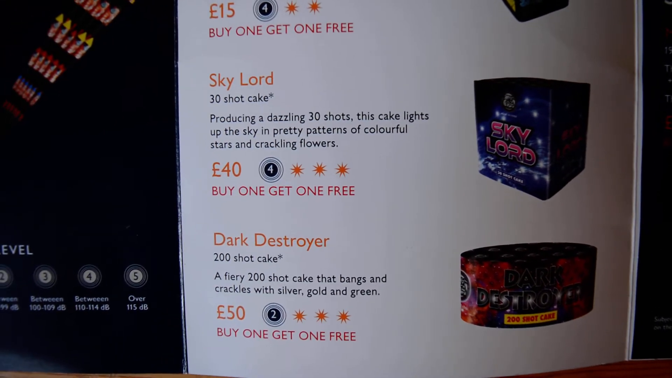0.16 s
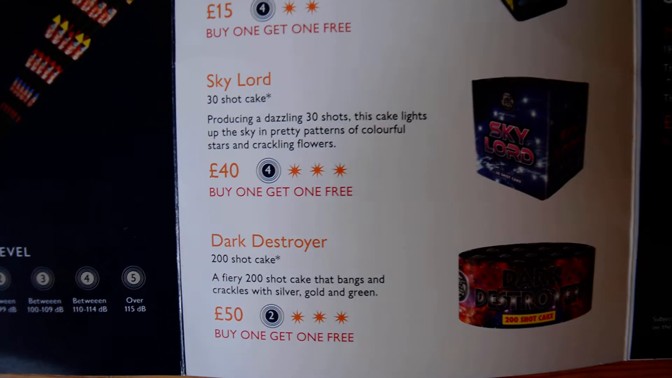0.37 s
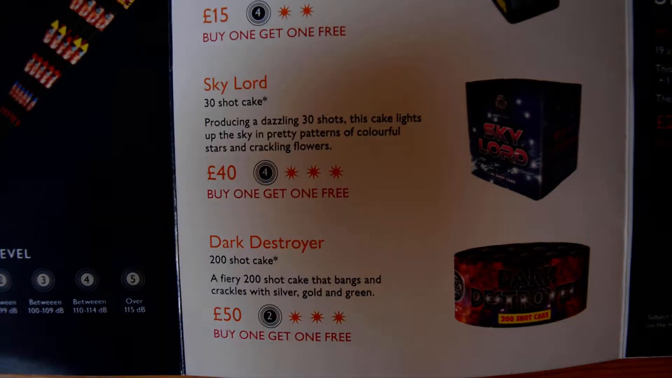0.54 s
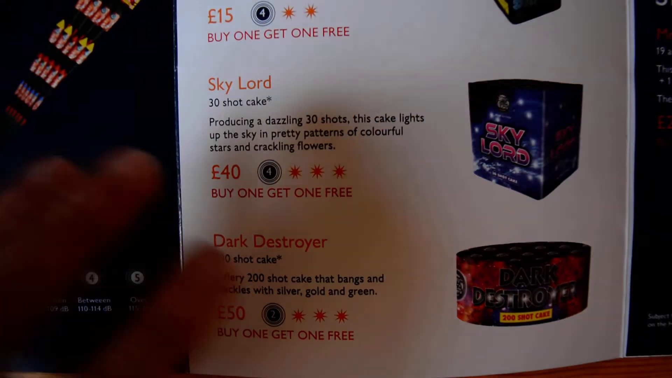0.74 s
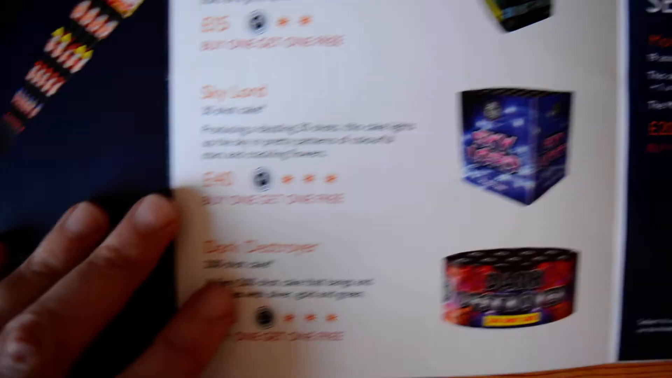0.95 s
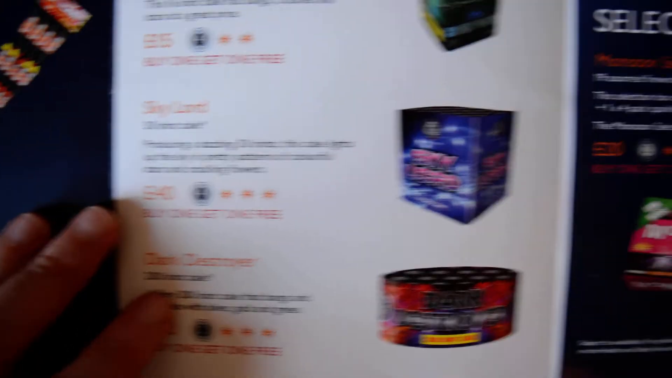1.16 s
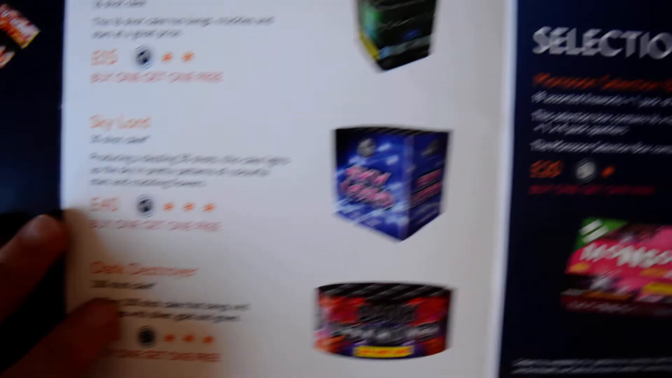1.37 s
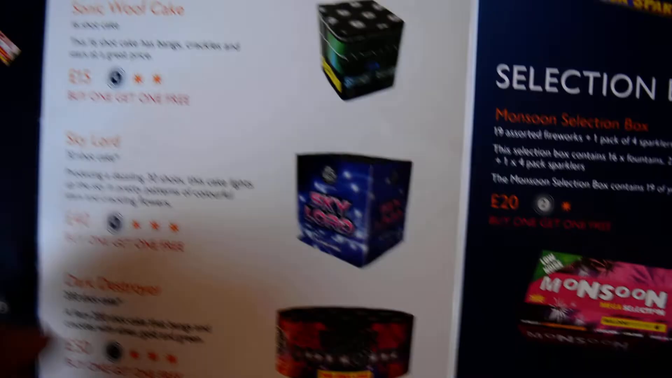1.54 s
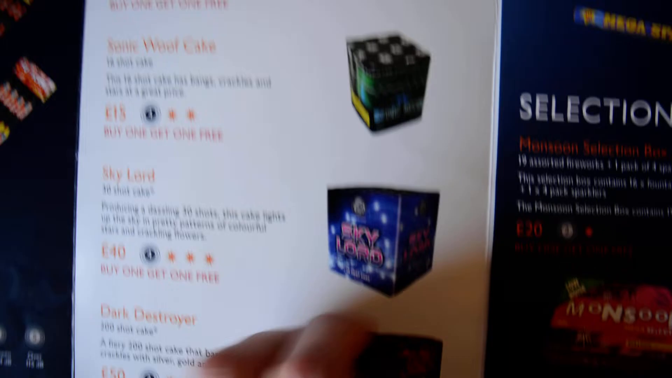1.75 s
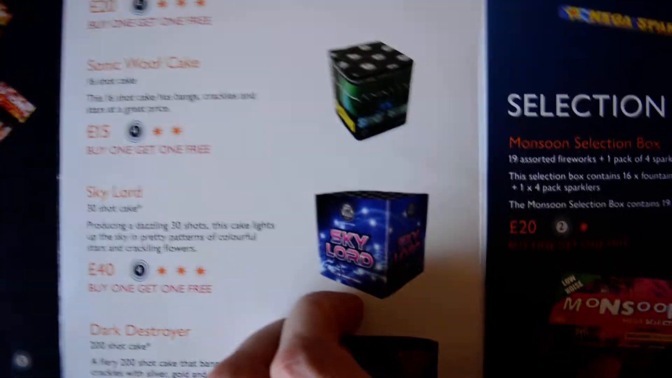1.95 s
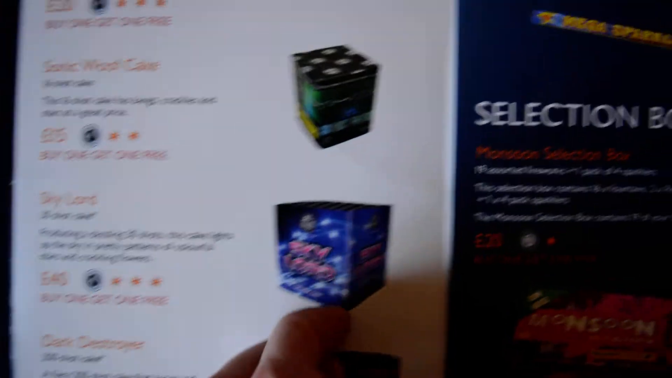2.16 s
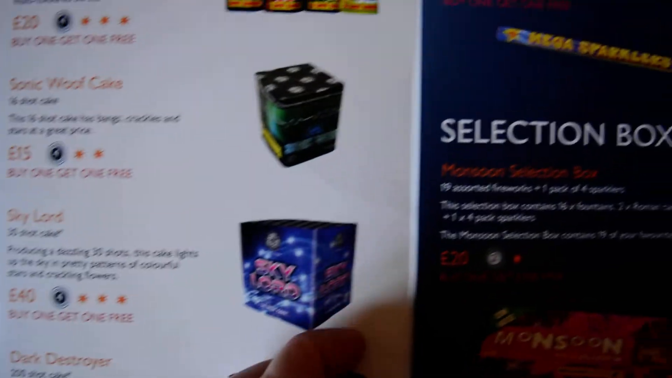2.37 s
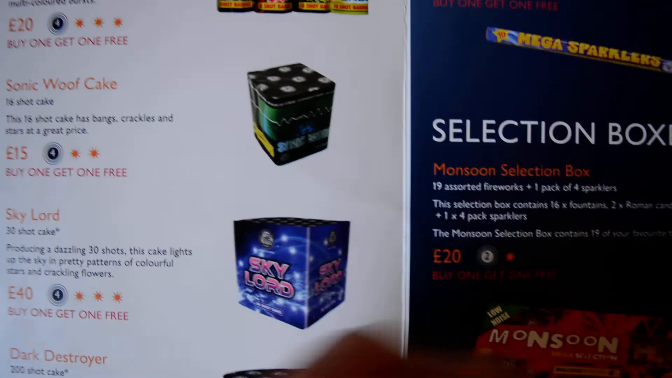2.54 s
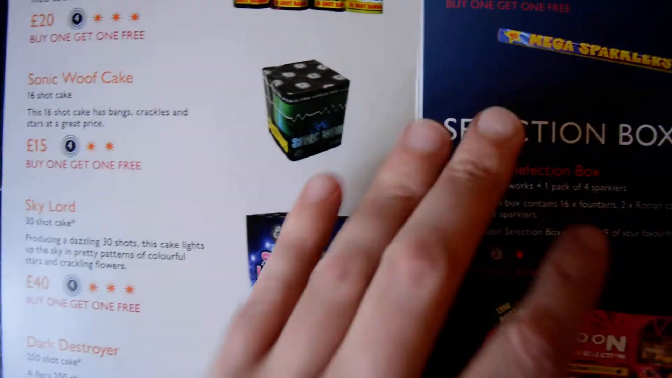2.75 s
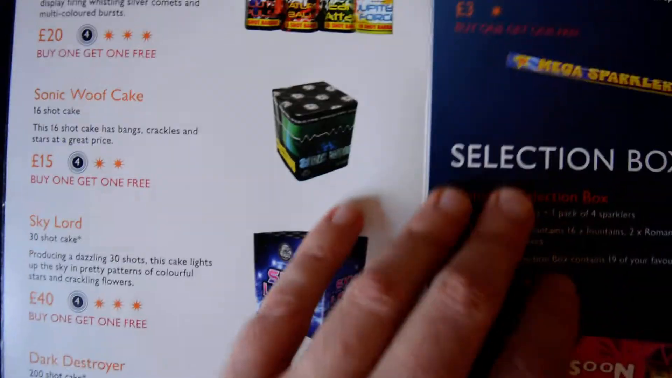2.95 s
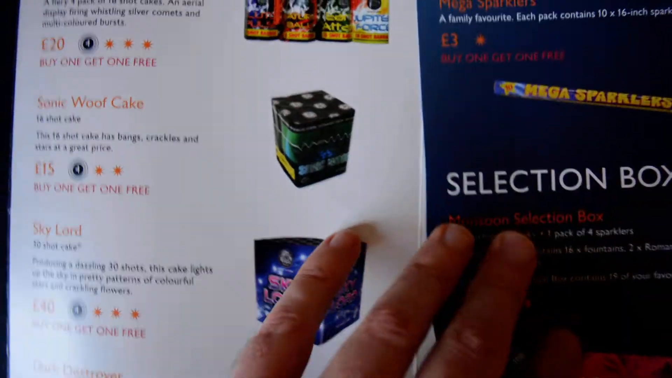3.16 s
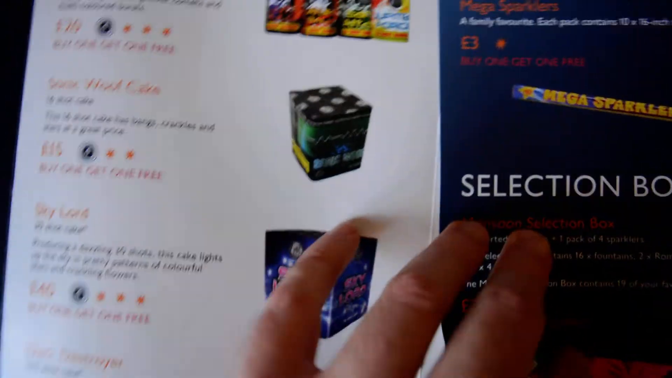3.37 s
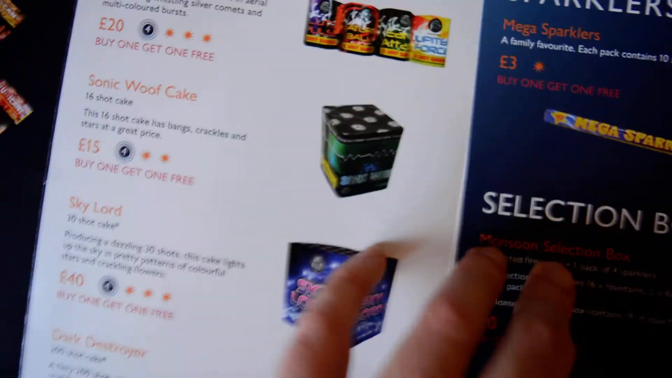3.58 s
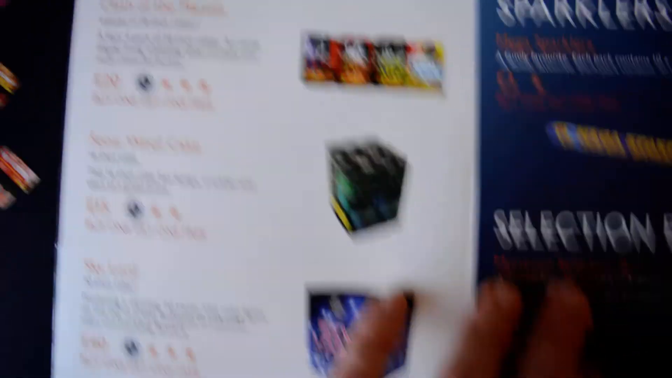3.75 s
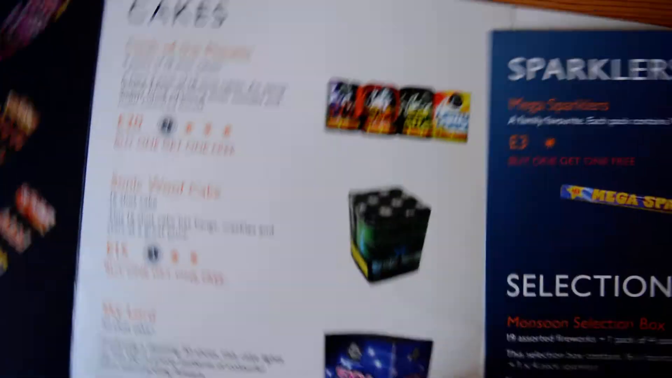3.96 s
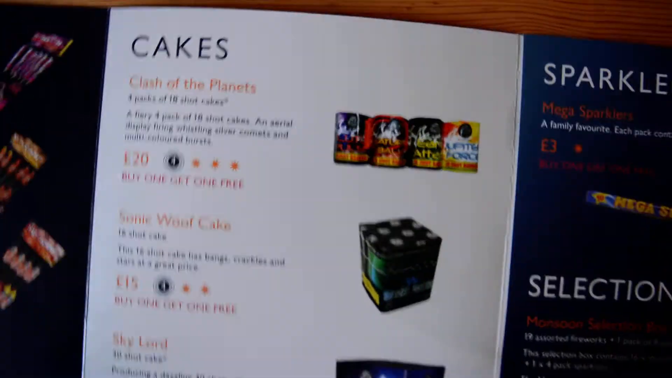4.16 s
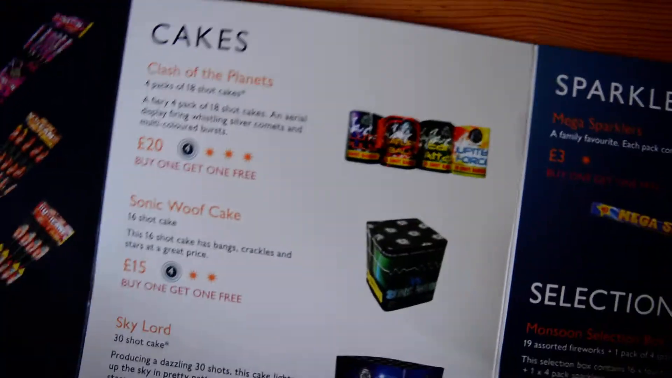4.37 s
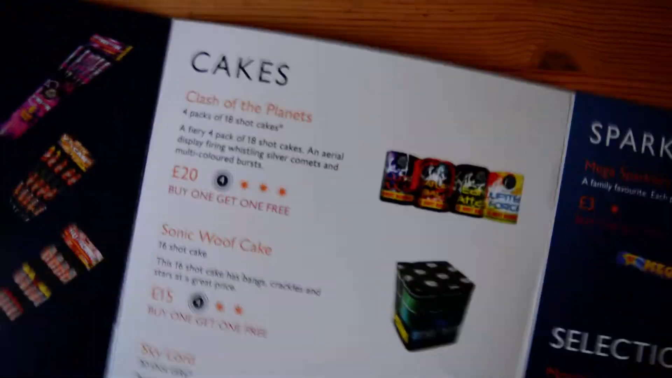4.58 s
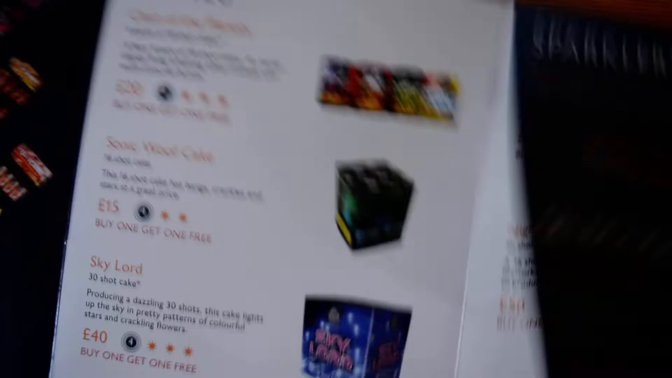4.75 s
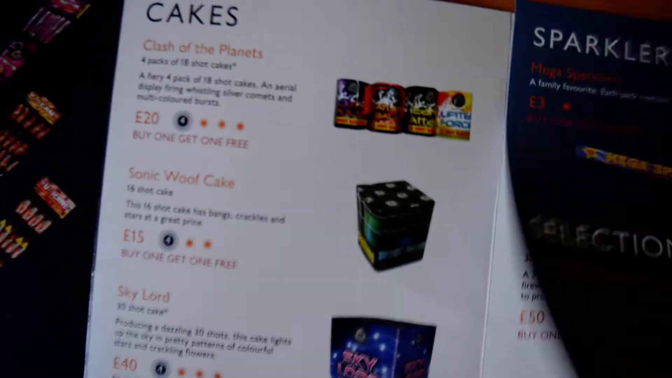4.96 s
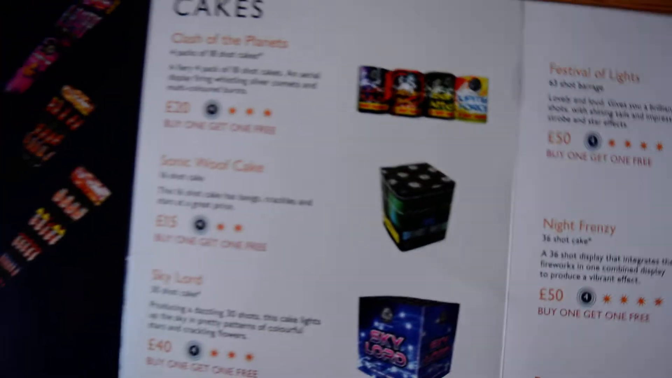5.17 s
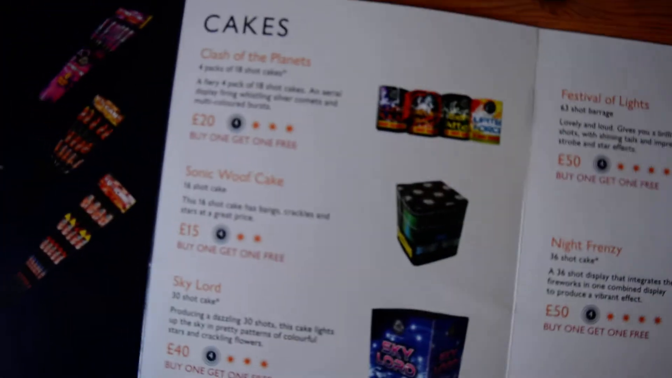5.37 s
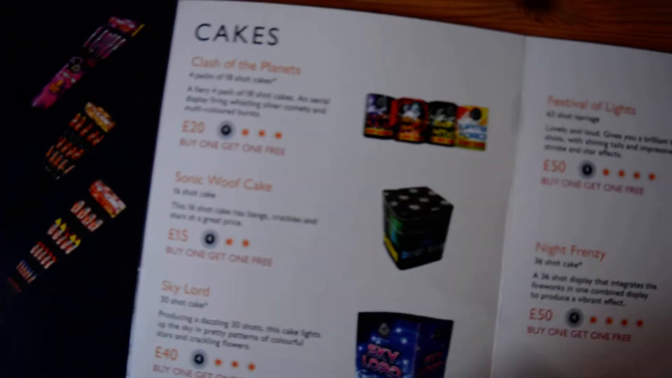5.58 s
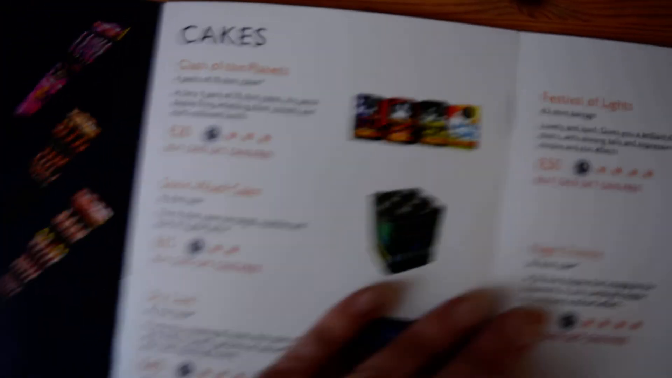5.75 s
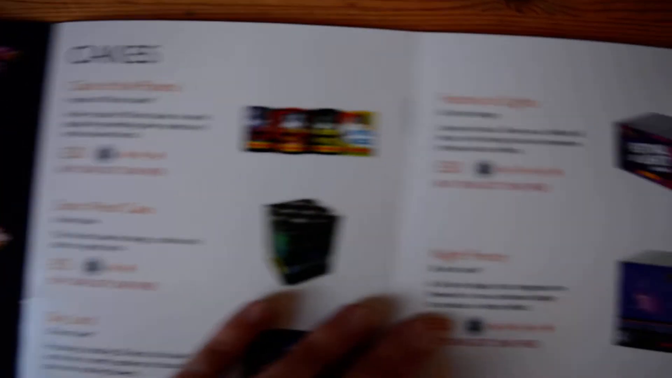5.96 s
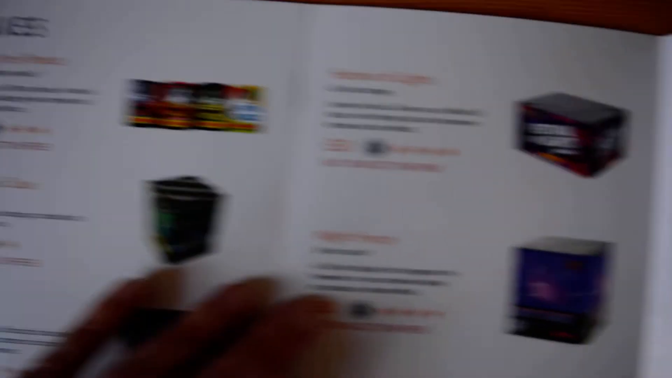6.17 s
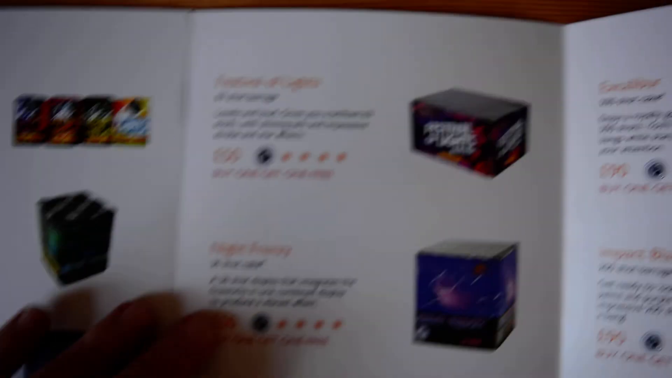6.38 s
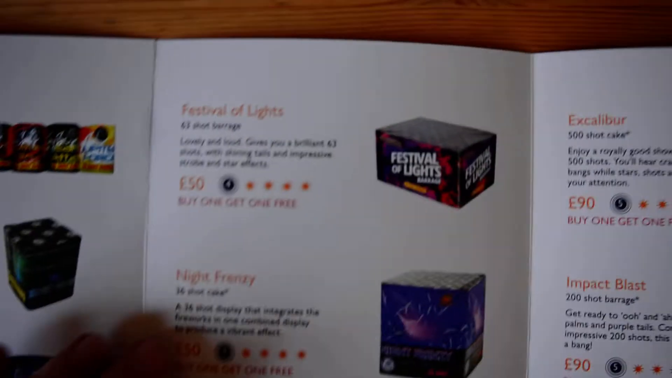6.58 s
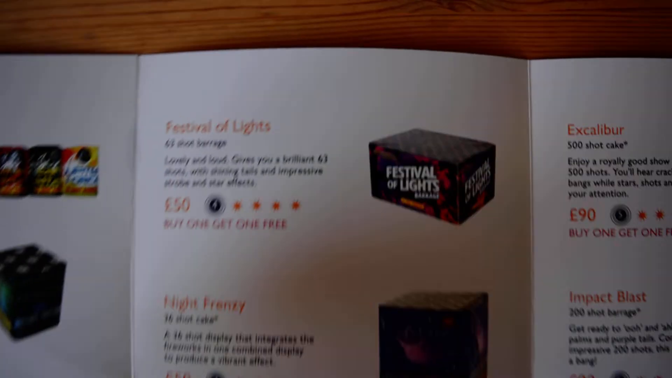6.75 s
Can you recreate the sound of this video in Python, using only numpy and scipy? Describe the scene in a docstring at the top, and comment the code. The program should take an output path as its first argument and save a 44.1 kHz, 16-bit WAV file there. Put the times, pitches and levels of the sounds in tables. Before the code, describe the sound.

Near silence, then a folded paper sheet rubs and hisses across a table. Fingertips knock the wood dully while creases pop and crackle, busiest around the middle. A flap then flips with a hard, overloaded snap, by far the loudest moment. Brief sliding strokes and small pops follow and fade out. Close stereo pickup, small quiet indoor space with a short reverberation.

```python
"""Folded leaflet on a wooden table

A folded glossy leaflet is pushed about on a wooden table, heard closely in a quiet room.
Random slips hiss through the sheet's bending resonance, and dents pop as short rings with crackle.
Soft finger taps and drags sound the table top; narrow whirrs and a low drone stay faint.
A flap flips flat with one sharp snap, a sum of short modes and noise; full scale clips."""
import sys
import numpy as np
from scipy import signal
from scipy.fft import rfft, irfft, next_fast_len
from scipy.io import wavfile
from scipy.ndimage import uniform_filter1d, map_coordinates

SR = 44100
rng = np.random.default_rng(int(sys.argv[2]) if len(sys.argv) > 2 else 0)


def master(y):
    """Save y as 16-bit WAV."""
    cut = np.clip(np.atleast_2d(y).T, -1, 1)
    pcm = np.round(cut * 32767)  # scale
    wavfile.write(sys.argv[1], SR, pcm.astype(np.int16))


N = 300762  # length in samples

# Hiss of the sheet's edge. Each row: frequency in Hz, density in dB per Hz.
EDGE_SPECTRUM = [(3500, -29), (6000, -3.5), (7500, -9), (9000, -5.5), (10800, -3), (12500, -10),
                 (14000, -18.5), (15800, -36.5)]
# Crackle of a crease. Each row: frequency in Hz, density in dB per Hz.
CREASE_SPECTRUM = [(40, -41), (150, -23), (600, -8), (1300, 1), (2500, 8.5), (4000, 4), (5300, -0.5),
                   (7000, -22.5), (15000, -64)]


def amp(db):
    """Decibels to gain."""
    return 10 ** (np.asarray(db) / 20)


def unit(x):
    """Scale to rms 1."""
    return x / np.sqrt(np.mean(x ** 2) + 1e-20)


def along(points, hz):
    """Read a curve of (Hz, value) points on a log frequency axis."""
    point_hz, values = np.transpose(points)
    return np.interp(np.log(hz + 1), np.log(point_hz + 1), values)


def wobble(rate):
    """A smooth random curve with rate knots a second."""
    knots = rng.standard_normal(int(N * rate / SR) + 4)
    return map_coordinates(knots, [np.arange(N) * rate / SR])


def filtered(x, response):
    """Filter x by a complex response of frequency."""
    n = x.shape[-1]
    padded = next_fast_len(n + 8192)  # room for the filter to ring out
    spectrum = rfft(x, padded) * response(np.fft.rfftfreq(padded, 1 / SR))
    return irfft(spectrum, padded)[..., :n]


def coloured(x, spectrum):
    """Shape x with a spectrum, at rms 1."""
    return unit(filtered(x, lambda hz: amp(along(spectrum, hz))))


def resonances(hz, modes):
    """The summed response of (Hz, width Hz, dB) modes, with hollows between them."""
    total = 0
    for centre, width, db in modes:
        total = total + amp(db) * 1j * hz * width / (centre * centre - hz * hz + 1j * hz * width)
    return total


def spread(pair):
    """Mix two unrelated signals into left and right, with a set likeness at each frequency."""
    # Each row: frequency in Hz, left-right correlation.
    likeness = [(100, 1), (400, 0.55), (1400, 0.95), (3200, .99), (5000, 0.95), (7000, 0.46), (15000, 0.8)]

    def mid_side_gains(hz):
        turn = np.arccos(np.clip(along(likeness, hz), -1, 1)) / 2
        return np.array([np.cos(turn), np.sin(turn)])

    mid, side = filtered(pair, mid_side_gains)
    return np.array([mid + side, mid - side])


def add(track, s, sound):
    """Mix a sound into the track at s seconds."""
    part = track[..., round(s * SR):][..., :sound.shape[-1]]
    part += sound[..., :part.shape[-1]]


def pulse(t, attack, t60):
    """A quick rise and an exponential fall by 60 dB per t60 seconds, top 1."""
    shape = (1 - np.exp(-(t / attack) ** 2)) * amp(-60 * t / t60)
    return shape / shape.max()


def burst(spectrum, envelope):
    """A pair of short coloured noises that carry the energy of their envelope."""
    noise = coloured(rng.standard_normal((2, len(envelope))), spectrum) * envelope
    return noise * np.linalg.norm(envelope) / np.linalg.norm(noise, axis=1, keepdims=True)


def stroke(start, hold, attack, release):
    """Gain of one movement: it rises, holds at 1 and falls, by 20 dB per attack or release time."""
    t = np.arange(N) / SR - start
    steps_down = np.maximum(-t / attack, (t - hold) / release)
    return amp(-20 * np.clip(steps_down, 0, 10))


def table_top(hz):
    """The wooden top's response: broad modes that radiate little deep bass."""
    # Modes of the table top. Each row: frequency in Hz, width in Hz, level in dB.
    modes = [(148, 50, -1.5), (230, 25, -2), (311, 60, -2), (519, 140, -1.5), (647, 97, -1.5),
             (800, 220, 0), (1310, 320, -6)]
    bass_cut = (1j * hz / (1j * hz + 55)) ** 2
    return resonances(hz, modes) * bass_cut


def air():
    """The steady hush of the room: coloured noise with a slight drift in level."""
    # Each row: frequency in Hz, density in dB per Hz.
    hush = [(20, -30), (70, -14), (160, -4), (400, -1.5), (800, -1), (1500, -4), (2200, -7), (3200, -10.5),
            (5000, -14), (8000, -18.5), (12000, -25.5), (15500, -34.5)]
    return amp(-56.5 + 0.5 * wobble(4.8)) * spread(coloured(rng.standard_normal((2, N)), hush))


def drags():
    """Dragging skin excites the table top's modes with noise under a wavering pressure."""
    # Finger drags. Each row: start in seconds, length in seconds, level in dB.
    moves = [(2, 0.29, -54), (2.38, 0.045, -49), (2.86, 0.099, -57.5), (3.54, 0.067, -55),
             (4.088, 0.18, -57), (4.8, 0.083, -57)]
    # The top under a light finger. Each row: frequency in Hz, width in Hz, level in dB.
    modes = [(153, 20.6, 4), (302, 40, 1.5), (658, 34, 2.5), (770, 69, -13)]
    pressure = sum(amp(db) * stroke(s, length, attack=0.04, release=0.1) for s, length, db in moves)
    rub = unit(filtered(rng.standard_normal(N), lambda hz: resonances(hz, modes)))
    return pressure * amp(1.38 * wobble(25)) * rub


def taps():
    """Each landing fingertip knocks the table top with a short noise pulse."""
    # Fingertips landing. Each row: time in seconds, knock's peak in dB before the skin softens it.
    landings = [(0.081, -45.5), (1.988, -43), (2.347, -36), (2.408, -34.5), (2.786, -35.5), (2.896, -38.5),
                (3.567, -43), (3.966, -32), (4.094, -31), (4.2, -28), (4.815, -28), (4.962, -35),
                (5.038, -37.5), (5.705, -42.5), (5.895, -37), (6.51, -38), (6.68, -42.5)]
    out, t = np.zeros(N), np.arange(SR // 6) / SR
    for s, db in landings:
        push = rng.standard_normal(len(t)) * pulse(t, attack=0.0015, t60=0.091)
        knock = filtered(push, table_top)
        add(out, s, amp(db) * knock / np.abs(knock).max())
    return out


def hand():
    """Drags and taps through soft skin, which excites little above its cutoff."""
    skin_hz = 1500
    return filtered(drags() + taps(), lambda hz: 1 / (1 - (hz / skin_hz) ** 2 + 1j * hz / skin_hz))


def gestures():
    """Level, resonance, its height and edge hiss of the moving sheet; stronger strokes weigh more."""
    # Steady pushes. Each row: start in seconds, length in seconds, level in dB, resonance in Hz at the
    # start and at the end, height of the resonance in dB, edge hiss in dB against the ring.
    pushes = [(0.922, 0.54, -33, 2420, 2820, 13, -12.5), (2.104, 0.61, -60, 3000, 2400, 2, -1),
              (3.59, 0.24, -34.5, 3870, 3100, 8.5, -8.5), (3.9, 0.65, -42.5, 2540, 3500, -0.5, -13),
              (4.77, 0.26, -41, 3300, 2780, 1.5, -14.5), (5.02, 0.22, -55.5, 2804, 4000, 1.5, -4.5),
              (5.75, 0.083, -35.5, 3160, 3970, 13.5, -7), (5.863, 0.45, -35, 3230, 3040, 13.5, -7),
              (6.336, 0.19, -42, 3150, 3040, 7.5, -12.5)]
    # Brushes that swell and fade. Each row: peak time in seconds, level in dB, length in seconds
    # (the 20 dB rise and 20 dB fall together), resonance in Hz, edge hiss in dB against the ring.
    brushes = [(0.145, -62, 0.16, 2000, -17), (0.36, -67, 0.16, 2000, -15),
               (1.713, -42.5, 0.065, 2300, -11), (1.908, -41.5, 0.27, 3000, -10),
               (1.975, -44.5, 0.062, 3200, -11), (2.485, -32.5, 0.048, 3480, -10.5),
               (2.794, -38.5, 0.055, 3300, -12), (2.851, -32.5, 0.1, 3830, -7.5),
               (2.971, -47, 0.2, 2800, -10), (3.038, -29.5, 0.098, 2500, -13.5),
               (3.127, -41.5, 0.31, 2500, -12.5), (3.327, -36, 0.19, 2200, -14),
               (3.44, -19.5, 0.069, 3300, -9), (3.757, -32.5, 0.12, 2850, 1),
               (3.94, -34.5, 0.12, 2400, -8.5), (4.088, -31, 0.14, 2520, -14),
               (4.244, -38, 0.11, 3500, -6.5), (4.333, -41.5, 0.1, 3500, -5.5),
               (4.647, -27.5, 0.19, 3270, -11.5), (4.705, -27.5, 0.17, 3170, -12),
               (4.818, -36, 0.065, 3300, -17), (5.27, -44.5, 0.27, 3800, -6)]
    rise_share = 0.37  # part of a brush spent swelling
    t, moves = np.arange(N) / SR, []
    for s, length, db, from_hz, to_hz, height_db, hiss_db in pushes:
        bend = np.clip((t - s) / length, 0, 1) ** 2.2  # the sheet bends mostly late in a push
        gain = amp(db) * stroke(s, length, attack=0.02, release=0.041)
        moves.append((gain ** 2, from_hz + (to_hz - from_hz) * bend, height_db, hiss_db))
    for s, db, length, hz, hiss_db in brushes:
        gain = amp(db) * stroke(s, 0, rise_share * length, (1 - rise_share) * length)
        moves.append((gain ** 2, hz, 7.5, hiss_db))  # 7.5 dB: height of the resonance
    powers, *colours = zip(*moves)
    total = sum(powers)
    level_db = 10 * np.log10(total)
    return [level_db] + [sum(p * v for p, v in zip(powers, colour)) / total for colour in colours]


def friction(rate, scatter_db, smooth):
    """Tiny slips of very unequal size over the even hiss of the fibres."""
    sizes = amp(scatter_db * np.clip(rng.standard_normal(N), -2.3, 2.3))
    slips = (rng.random(N) < rate / SR) * sizes
    return unit(slips * rng.choice([-1, 1], (2, N))) + smooth * rng.standard_normal((2, N))


def bent(x, centre_hz, height_db, octaves, patchy_db):
    """One resonance follows the bend of the sheet; many weak ones come and go as its shape changes."""
    hz, t, bins = signal.stft(x, SR, nperseg=512)
    centre, height = (np.interp(t, np.arange(N) / SR, curve) for curve in (centre_hz, height_db))
    bell = 1 / (1 + (np.log2((hz[:, None] + 1) / centre) / octaves) ** 2)
    patches = uniform_filter1d(rng.standard_normal(bell.shape), size=3, axis=0)
    patches = uniform_filter1d(patches, size=12, axis=1)
    # half the height lifts the peak, the other half lowers what lies far from it
    gain = amp(height * (bell - 0.5) + patchy_db * unit(patches))
    return signal.istft(bins * gain, SR, nperseg=512)[1][:, :N]


def crinkles(rate, scatter_db, t60):
    """Sparse tiny creases give way, each a short crackle of its own size."""
    t = np.arange(SR // 40) / SR
    sizes = (rng.random(N) < rate / SR) * amp(scatter_db * rng.uniform(-0.89, 1, N))
    envelope = signal.fftconvolve(sizes, pulse(t, attack=0.00019, t60=t60))[:N]
    return coloured(envelope * rng.standard_normal((2, N)), CREASE_SPECTRUM)


def sliding():
    """Slips drive the sheet's resonance, its low body and the hiss of its edge; it crinkles as it goes."""
    # Ring of the sheet. Each row: frequency in Hz, density in dB per Hz.
    sheet_spectrum = [(500, -56.5), (1200, -7.5), (1800, -2.5), (2600, 0.5), (3800, 0.5), (5200, -2.5),
                      (6500, -18.5), (9000, -18.5), (15000, -79.5)]
    # Low body of the sheet. Each row: frequency in Hz, density in dB per Hz.
    body_spectrum = [(100, -23.5), (280, -12), (480, -11), (800, 2), (1100, -4), (1420, 2.5), (1900, -8),
                     (3000, -9), (6000, -71)]
    level_db, centre_hz, height_db, hiss_db = gestures()
    slips = friction(rate=1400, scatter_db=4.5, smooth=1.26)
    bending = bent(slips, centre_hz, height_db, octaves=0.33, patchy_db=3.0)
    ring = coloured(bending, sheet_spectrum)
    # the body is -54 dB under a -35 dB slide and gains 0.28 dB per dB of slide
    body = amp(-54 + 0.28 * (level_db + 35)) * coloured(slips, body_spectrum)
    edge = amp(hiss_db) * coloured(slips, EDGE_SPECTRUM)
    crackle = amp(-8) * crinkles(rate=60, scatter_db=10, t60=0.017)
    level = amp(level_db - 2.0 + 1.23 * wobble(45))
    return spread(level * (ring + edge + crackle) + body)


def buckles():
    """A dent flips through: the panel rings briefly, the crease crackles and the table is nudged."""
    # The sheet buckling. Each row: time in seconds, overall level in dB, panel pitch in Hz, then the
    # edge crack and the table thump in dB under that level, before their trims of +2 and -4.5 dB.
    dents = [(0.899, -29, 1700, -34, -27), (1.7803, -18.5, 3440, -29, -14.5),
             (2.0156, -29.5, 2800, -36, -0.5), (2.7766, -22.5, 2220, -30, -32),
             (2.7873, -17, 3470, -27, -17.5), (3.3557, -8, 2050, -21, -45), (3.3917, -14, 2160, -22, -16),
             (3.4228, -8.5, 1370, -25, -9), (3.4236, -4, 1940, -15, -15), (3.4315, -3, 2260, -21, -37.5),
             (3.4377, -7.5, 2030, -21, -7.5), (3.677, -18, 3460, -21, -38), (3.7891, 1.5, 2750, -33, -17),
             (3.8792, -5, 1480, -40, -16), (3.9738, -16.5, 3560, -40, -16.5), (4.1052, -9, 3320, -33, -4.5),
             (4.2058, -3, 1770, -42, -15), (4.4692, -16, 3710, -28, -15), (4.4724, -4.5, 2180, -33, -19.5),
             (4.8902, -17, 1240, -37, -15), (5.3448, -29, 2400, -20, -9), (6.122, -19.5, 3490, -22, -35),
             (6.325, -9.5, 3180, -25, -40), (6.4243, -19.5, 3310, -27, -38)]
    out, t = np.zeros((2, N)), np.arange(SR // 10) / SR
    for s, db, hz, crack_db, thump_db in dents:
        t60 = 0.018 * 2 ** (db / 26.5)  # seconds; it halves for every 26.5 dB less
        panel = np.sin(2 * np.pi * hz * t) * pulse(t, attack=0.0009, t60=t60)
        # a wider dent rings lower and its crease sounds duller too
        tone = np.array(CREASE_SPECTRUM) * [(hz / 2500) ** 0.5, 1]
        crease = burst(tone, pulse(t, attack=0.00018, t60=1.86 * t60))
        crack = burst(EDGE_SPECTRUM, pulse(t, attack=0.0004, t60=1.34 * t60))
        nudge = rng.standard_normal(len(t)) * pulse(t, attack=0.00053, t60=0.038)
        thump = filtered(nudge, table_top)
        sound = amp(-11.5) * crease + amp(crack_db + 2) * crack
        # panel and thump enter one input of the spread only
        sound[0] += amp(-10.5) * panel + amp(thump_db - 4.5) * thump / np.abs(thump).max()
        add(out, s, amp(db) * sound)
    return spread(out)


def whirr():
    """Two narrow bands of noise linger faintly."""
    # Each row: start in seconds, length in seconds.
    spells = [(1.52, 0.28), (6.547, 0.23)]
    # Each row: frequency in Hz, width in Hz, level in dB.
    bands = [(1407, 50, 2), (2014, 110, -4.5)]
    gain = amp(-55) * sum(stroke(s, length, attack=0.06, release=0.12) for s, length in spells)
    return gain * unit(filtered(rng.standard_normal(N), lambda hz: resonances(hz, bands)))


def snap():
    """The whole flap flips at once: its modes, a crack, a puff of air and a dying shudder."""
    # The flip: time in seconds, level in dB.
    s, db = (5.3761, 0)
    # Modes of the flap. Each row: frequency in Hz, level in dB, time to fall by 60 dB in seconds.
    modes = [(133, -29.5, 0.086), (530, -18, 0.0082), (912, -15.5, 0.066), (1070, -3, 0.02),
             (1400, 0, 0.01), (1590, -0.5, 0.0044), (2354, -7, 0.017), (3300, -31, .012),
             (3490, -16, 0.022)]
    # Each row: frequency in Hz, density in dB per Hz.
    shudder_spectrum = [(100, -28), (450, -15), (780, 6.5), (1100, 2), (1450, 4.5), (2200, -4.5),
                        (3600, -20), (6000, -28.5), (11000, -30), (15000, -55.5)]
    out, t = np.zeros(N), np.arange(SR // 4) / SR
    ring = np.zeros(len(t))
    for hz, level, t60 in modes:
        ring += amp(level) * np.sin(2 * np.pi * hz * t) * pulse(t, attack=0.00049, t60=t60)
    crack = coloured(rng.standard_normal(len(t)), CREASE_SPECTRUM) * pulse(t, attack=0.000087, t60=0.027)
    shudder = coloured(rng.standard_normal(len(t)), shudder_spectrum) * pulse(t, attack=0.0016, t60=0.22)
    u = t / 0.0046
    puff = (1 - u) * np.exp(-u)  # pressure, then a longer suction
    add(out, s, amp(db) * (ring + amp(-17.5) * crack + amp(-19) * shudder + amp(-30.0) * puff))
    return out


def smoothing():
    """Fingers flatten the opened leaflet and the hollow under its fold drones."""
    # One slow stroke: peak time in seconds, level in dB, 20 dB rise and 20 dB fall in seconds.
    s, db, rise, fall = (6, -57, 0.36, 0.7)
    # Each row: frequency in Hz, density in dB per Hz.
    hollow = [(120, -36), (210, -14), (245, 1.5), (310, -0.5), (360, -3), (450, -18), (900, -50)]
    return amp(db) * stroke(s, 0, rise, fall) * coloured(rng.standard_normal(N), hollow)


def room(x, wet_db, build):
    """A few near echoes, and a short diffuse tail that lasts longest in the bass."""
    # Decay of the tail. Each row: frequency in Hz, time to fall by 60 dB in seconds.
    decay = [(150, 0.65), (400, 0.27), (1100, 0.35), (2800, 0.32), (7000, 0.35), (14000, 0.12)]
    # Colour of the tail. Each row: frequency in Hz, level in dB.
    tone = [(100, -4), (400, 11.5), (900, 2), (1500, 2.5), (2500, 0.5), (6000, 3), (14000, 13)]
    # Early echoes. Each row: delay in seconds, level in dB.
    echoes = [(.0022, -34.5), (.0052, -33.5), (.0098, -21.5), (0.0113, -20), (0.0139, -28.5), (.022, -28.5)]
    hz, t, bins = signal.stft(rng.standard_normal((2, SR // 2)), SR, nperseg=256)
    fade = amp(along(tone, hz)[:, None] - 60 * t / along(decay, hz)[:, None])
    fade = fade * (1 - np.exp(-(t / build) ** 2))
    tail = spread(signal.istft(bins * fade, SR, nperseg=256)[1])
    answer = amp(wet_db) * tail / np.linalg.norm(tail[0])
    for delay, db in echoes:
        add(answer, delay, np.full(1, amp(db)))
    return x + signal.fftconvolve(np.atleast_2d(x), answer, axes=1)[:, :N]


def scene():
    """Sliding, handling, pops and the snap over the room's hush."""
    rubbing = room(sliding() + smoothing(), wet_db=-9.5, build=0.0073)
    pops = room(buckles(), wet_db=-8.0, build=0.0065)
    flip = room(snap(), wet_db=-10, build=0.0038)
    return rubbing + hand() + pops + flip + whirr() + air()


def ports(hz, centre_hz, width_hz):
    """The right microphone port lags a whole turn through its treble resonance."""
    pole = centre_hz ** 2 - hz ** 2 + 1j * hz * width_hz
    return np.array([np.ones_like(pole), pole.conj() / pole])


def record(dry):
    """Two microphone ports, clipping at full scale, then a band limit at 15750 Hz."""
    heard = filtered(dry, lambda hz: ports(hz, centre_hz=8930, width_hz=500))
    return filtered(np.clip(heard, -1, 1), lambda hz: hz < 15750)


dry = scene()
out = record(dry)
master(out)
```